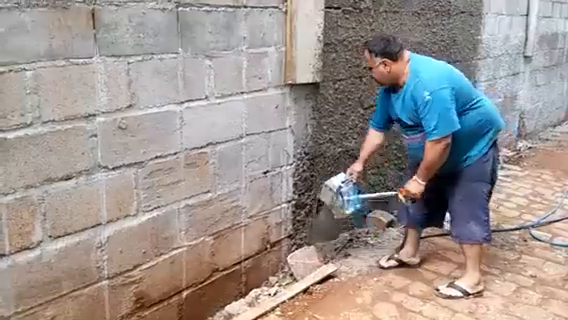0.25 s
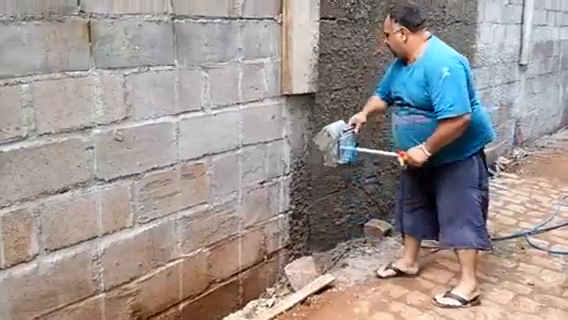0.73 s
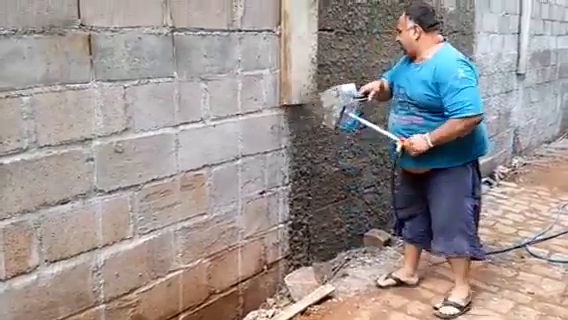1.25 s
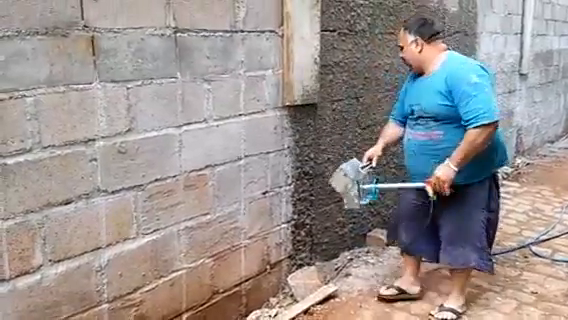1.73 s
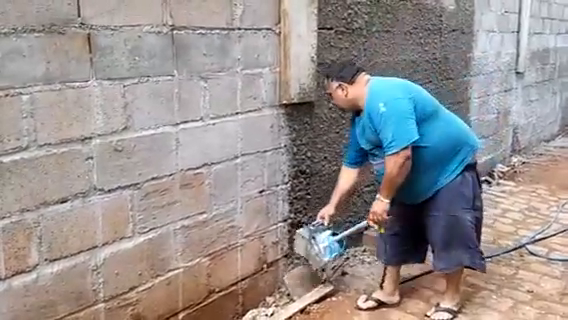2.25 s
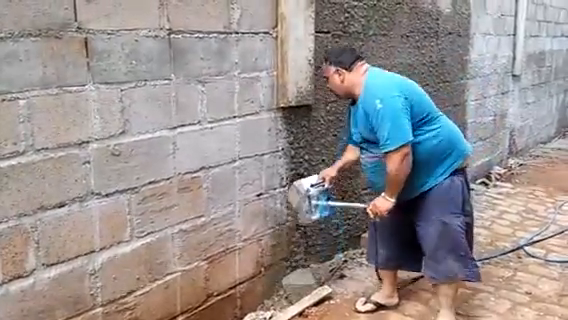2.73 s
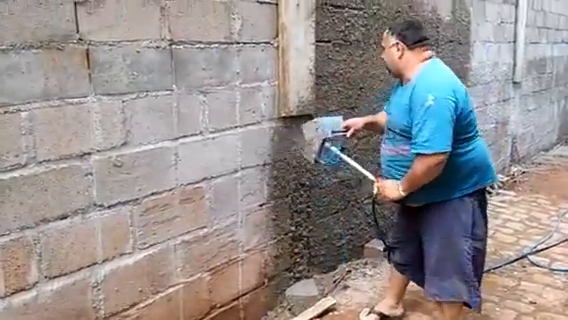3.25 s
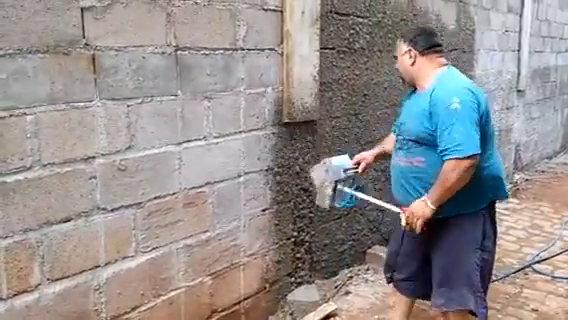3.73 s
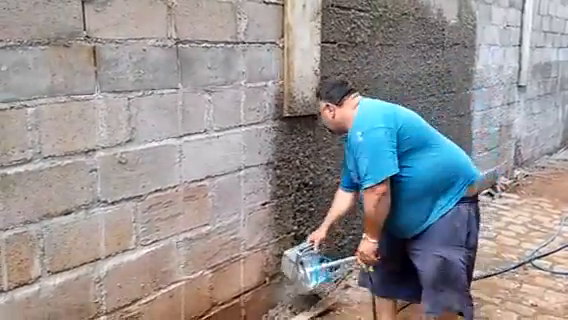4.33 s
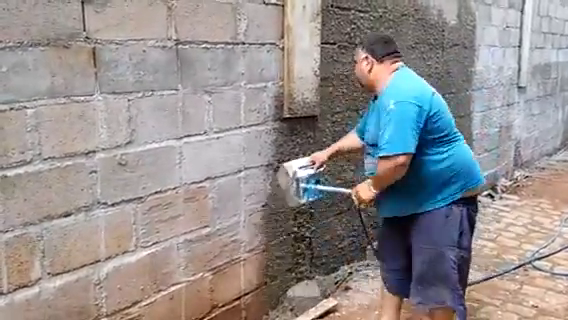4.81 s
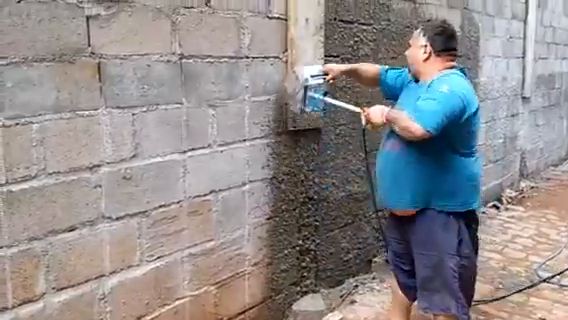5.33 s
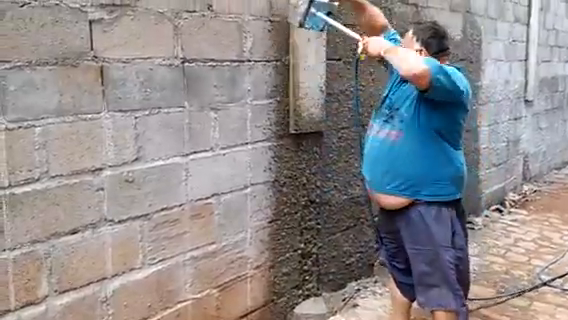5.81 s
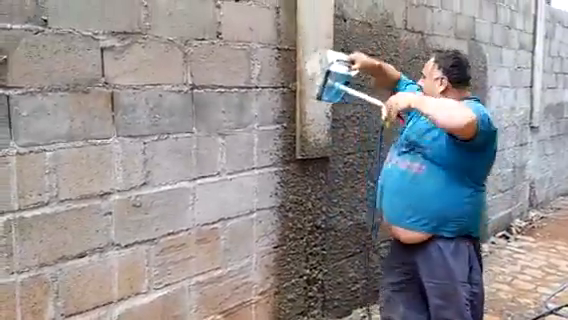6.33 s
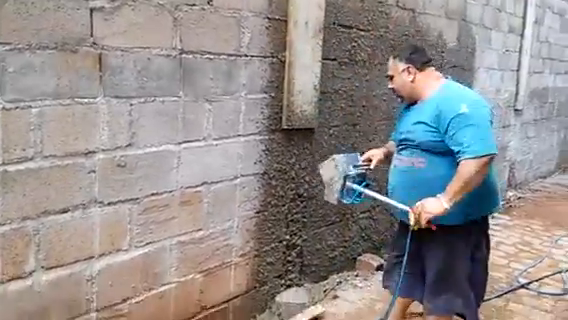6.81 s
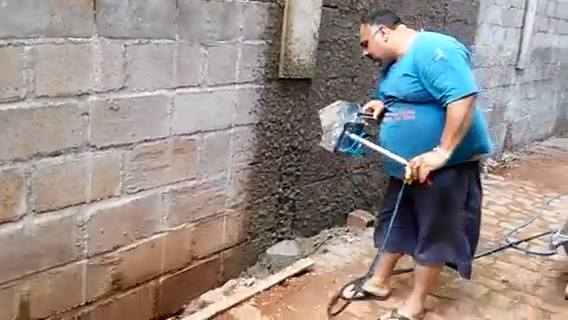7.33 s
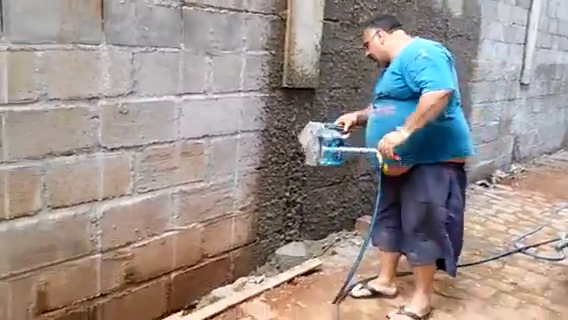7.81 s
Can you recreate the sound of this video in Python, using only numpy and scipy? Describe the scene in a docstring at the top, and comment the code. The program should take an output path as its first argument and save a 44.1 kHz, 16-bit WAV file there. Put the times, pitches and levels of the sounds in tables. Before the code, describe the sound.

Close outdoor capture with slight reflections from wall and ground: loud rushing air throws wet slurry, choking and spitting as lumps pass. Two bursts start slightly soft; the third, longest, opens with a sharp surge. Between them come airy valve singing, dwindling hiss, small wet clicks and low puffs of wind. Finally the spraying stops, and rumbling wind swells into hard, crackling slaps that overload the microphone.

```python
"""Mortar gun in a narrow yard.

A compressed-air gun throws slurry at a block wall in three bursts: filtered noise, sputtered by mortar lumps.
Two bursts open slightly soft, the third with a surge; each dies away as the valve closes and sings, then leaks.
Hollow hopper notes glide, sand grains hit the wall as clustered impulses, splats are short noise swells.
Wind is time-warped noise plus single pressure pulses, at last so strong that a limiter ducks all else."""
import sys
import numpy as np
from scipy import signal
from scipy.fft import rfft, irfft, next_fast_len
from scipy.io import wavfile
from scipy.ndimage import uniform_filter1d, minimum_filter1d, map_coordinates

SR = 44100
rng = np.random.default_rng(int(sys.argv[2]) if len(sys.argv) > 2 else 0)


def generate_wav(sig):
    """Save sig (samples, or channels by samples) to the path in sys.argv[1] as 16-bit PCM at SR."""
    pcm = np.round(np.clip(np.atleast_2d(sig).T, -1, 1) * 32767).astype(np.int16)
    wavfile.write(sys.argv[1], SR, pcm)


N = 355446
TIME = np.arange(N) / SR


def from_db(db):
    """Decibels to amplitude gain."""
    return 10 ** (np.asarray(db) / 20)


def rms_one(x):
    """Scale to an rms of 1."""
    return x / np.sqrt(np.mean(x ** 2) + 1e-20)


def in_time(rows):
    """Interpolate the columns of a curve at every sample."""
    s, *columns = np.transpose(rows)
    return [np.interp(TIME, s, column) for column in columns]


def latest(starts, values):
    """Hold each value from its own start to the next."""
    return values[np.maximum(np.searchsorted(starts, TIME) - 1, 0)]


def since(starts):
    """Seconds since the latest start."""
    return np.maximum(TIME - latest(starts, starts), 0)


def white():
    """Fresh white noise."""
    return rng.standard_normal(N)


def shaped(x, gain_at):
    """Filter by a gain given as a function of frequency; rms 1."""
    size = next_fast_len(len(x))
    hz = np.maximum(np.arange(size // 2 + 1) * SR / size, 1)
    return rms_one(irfft(rfft(x, size) * gain_at(hz), size)[:len(x)])


def coloured(x, points):
    """Filter by a (frequency [Hz], level [dB]) table, interpolated in log frequency; rms 1."""
    at_hz, db = np.transpose(points)
    return shaped(x, lambda hz: from_db(np.interp(np.log(hz), np.log(at_hz), db)))


def resonant(x, centre_hz, width_hz):
    """Two passes through one resonance, about width_hz wide at -3 dB overall; rms 1."""
    return shaped(x, lambda hz: 1 / (1 + ((hz - centre_hz ** 2 / hz) / (1.5 * width_hz)) ** 2))


def wobble(rate_hz, size=N):
    """Random motion up to about rate_hz; rms 1."""
    return shaped(rng.standard_normal(size), lambda hz: 1 / (1 + (hz / rate_hz) ** 4))


def gliding(centre_hz, width_hz):
    """Noise band round a moving centre: two slow wobbles on carriers in quadrature."""
    phase = 2 * np.pi * np.cumsum(centre_hz) / SR
    in_phase = wobble(width_hz / 2, size=len(phase)) * np.cos(phase)
    return in_phase + wobble(width_hz / 2, size=len(phase)) * np.sin(phase)


def mottled(x, depth_db, patch_hz, patch_s):
    """Random patches of louder and softer colour over time and frequency."""
    hz, s, cells = signal.stft(x, SR, nperseg=512)
    field = rng.standard_normal(cells.shape)
    for _ in range(2):
        field = uniform_filter1d(field, max(int(patch_hz / hz[1]), 1), axis=0)
        field = uniform_filter1d(field, max(int(patch_s / s[1]), 1), axis=1)
    patched = signal.istft(cells * from_db(depth_db * rms_one(field)), SR)[1][:N]
    return np.std(x) * rms_one(patched)


def add(out, start, length, sound, rise, fall):
    """Mix in a swell of sound; rise and decay constant are shares of its length."""
    t = TIME[:len(sound)]
    onset = np.sin(np.pi / 2 * np.minimum(t / (rise * length), 1)) ** 2
    decay = np.exp(-np.maximum(t / length - .75, 0) / fall)
    at = int(start * SR)
    out[at:at + len(sound)] += (onset * decay * sound)[:max(N - at, 0)]


def notes(rows, width_hz, rise, fall):
    """Narrow noise bands that swell, glide and fade."""
    out, t = np.zeros(N), TIME[:SR]
    for start, length, db, first_hz, last_hz in rows:
        note = gliding(np.interp(t, [0, length], [first_hz, last_hz]), width_hz)
        add(out, start, length, from_db(db) * note, rise, fall)
    return out


# Trigger pulls: (opens [s], closes [s], jet level [dB], opening level change, + surge or - soft start [dB],
# dying away [dB/s], plume level re jet [dB])
TRIGGER_PULLS = [(0.115, 1.479, -23, -3.5, 88.5, -27), (2.357, 3.651, -24, -1, 80.5, -28),
                 (4.472, 6.252, -24.5, 7, 86, -16.5)]
OPENING_S, SETTLE_S, SAG_DB_PER_S = 0.0044, 0.046, 0.65   # the hose loses pressure while open


def air_flow():
    """Jet strength: a brief swell or dip at opening, a slow sag, a steady dB fade once let go."""
    flow = np.zeros(N)
    for opens, closes, db, opening_db, dying_db_per_s, *_ in TRIGGER_PULLS:
        age, shut = np.maximum(TIME - opens, 0), np.maximum(TIME - closes, 0)
        opening_change_db = opening_db * np.exp(-age / SETTLE_S)
        level_db = db + opening_change_db - SAG_DB_PER_S * age - dying_db_per_s * shut
        flow += from_db(level_db) * np.minimum(age / OPENING_S, 1)
    return flow


# Nozzle hiss colour: (frequency [Hz], level [dB])
NOZZLE_COLOUR = [(300, -43.5), (600, -16.5), (850, -8), (1250, -3.5), (1500, -5), (1900, -6), (2650, -5),
                 (3400, -2.5), (4200, -13.5), (5300, -2), (6500, -0.5), (8100, -1.5), (9000, 2.5),
                 (9700, 0)]
# Hopper note, rising as it empties, sinking as mortar slumps back: (time [s], pitch [Hz], level [dB])
HOPPER_NOTE = [(.12, 573, -19), (.4, 620, -23), (.62, 910, -33), (.95, 1168, -10), (1.25, 1105, -14),
               (1.46, 1044, -10.5), (1.75, 782, -18), (2.36, 597, -19), (2.6, 633, -28), (2.77, 904, -12),
               (3.05, 1020, -17), (3.35, 983, -17), (3.6, 846, -11), (3.9, 758, -24), (4.5, 703, -37),
               (5.05, 898, -20), (5.35, 1104, -20), (6.2, 1076, -13)]
# The mouth's note starts sharp and settles as the first mortar leaves
MOUTH_HZ, MOUTH_SHARP_HZ, MOUTH_SETTLE_S, MOUTH_WIDTH_HZ = 4060, 262.2, .25, 1320
FULL_TILT_M = 1.06   # above this height the mouth turns away


def jet(height_m, age_s, mouth_db=-11, mouth_turn_db_per_m=-10, body_db=-10.0):
    """Nozzle hiss with the resonances of the hopper's mouth and of its hollow body."""
    hollow_hz, hollow_db = in_time(HOPPER_NOTE)
    mouth_hz = MOUTH_HZ + MOUTH_SHARP_HZ * np.exp(-age_s / MOUTH_SETTLE_S)
    mouth_level_db = mouth_db + mouth_turn_db_per_m * np.maximum(height_m - FULL_TILT_M, 0)
    mouth = from_db(mouth_level_db) * gliding(mouth_hz, MOUTH_WIDTH_HZ)
    hollow = from_db(hollow_db) * gliding(hollow_hz, width_hz=220)
    air = mottled(coloured(white(), NOZZLE_COLOUR) + mouth, depth_db=2.5, patch_hz=220, patch_s=0.045)
    return air + from_db(body_db) * hollow


# Sand-on-wall colour: (frequency [Hz], level [dB])
GRIT_COLOUR = [(600, -7), (1100, 3), (2000, 8), (3000, -14.5), (5000, 15.5), (9500, -15.5)]
GRAINS_PER_S = 1900   # median; clumping varies it


def spatter(clump_db=5, size_db=1.0):
    """Wet sand grains hit the wall: random impulses whose density clumps."""
    hits = rng.random(N) < GRAINS_PER_S / SR * from_db(clump_db * wobble(35))
    sizes = from_db(size_db * np.minimum(rng.exponential(1, N), 4)) * rng.choice([-1, 1], N)
    return coloured(hits * sizes, GRIT_COLOUR)


# Mortar lumps in the jet, spitting (+) or choking (-): (time [s], half length [s], level change [dB])
MORTAR_LUMPS = [(0.24, .012, 5), (0.298, 0.011, 5), (0.532, .012, -2), (0.614, 0.017, 5), (0.707, 0.022, 6),
                (0.76, .014, 3.5), (.82, .014, 1), (1.09, 0.01, -2), (1.348, .016, -1.5),
                (1.423, 0.03, 3.5), (2.625, .014, 1.5), (2.687, 0.021, 4.5), (2.758, 0.023, 3.5),
                (2.834, 0.026, -4.5), (2.903, .02, -2.5), (2.996, 0.013, 5), (3.024, .012, 3),
                (3.1, 0.011, 2.5), (3.29, .028, 4), (3.512, .016, 3.5), (3.56, 0.015, 3.5),
                (4.573, 0.014, -7), (4.615, 0.011, 0.5), (4.665, 0.017, 4), (4.868, 0.013, 4),
                (4.94, 0.014, -2.5), (5.029, 0.015, 6.5), (5.14, 0.0098, 2.5), (5.177, 0.014, -1),
                (5.266, .014, 0), (5.33, 0.017, 4), (5.377, .012, 7), (5.477, 0.0075, 2), (5.572, 0.015, 6),
                (5.639, 0.013, 0)]


def sputter(spray, wet_hz=3600, treble_share=0.12, lump_db=1.35, gargle_db=0.98):
    """Lumps choke the jet and are blown clear; below wet_hz the level swings more than above."""
    spit_db = gargle_db * wobble(41)
    for s, half_length, db in MORTAR_LUMPS:
        spit_db = spit_db + db * np.exp(-np.minimum(((TIME - s) / half_length) ** 2, 20))
    wet = signal.sosfiltfilt(signal.butter(2, wet_hz, fs=SR, output="sos"), spray)
    lumps = from_db(lump_db * resonant(white(), 40, 45))
    return lumps * (wet * from_db(spit_db) + (spray - wet) * from_db(treble_share * spit_db))


# Plume roar colour: (frequency [Hz], level [dB])
PLUME_COLOUR = [(30, -17), (90, -13), (180, -2.5), (260, 1.5), (350, 2.5), (450, -5), (600, -4), (900, -18),
                (1500, -16)]
PLUME_DB_PER_M = 10


def plume(height_m, opens_s, plume_db):
    """Low roar of the spray plume, louder as the gun is lifted."""
    level_db = latest(opens_s, plume_db) + PLUME_DB_PER_M * height_m
    return from_db(level_db) * coloured(white(), PLUME_COLOUR)


# Hollow tones in the spray: (start [s], length [s], level [dB], first pitch [Hz], last pitch [Hz])
HOLLOW_TONES = [(.13, 0.36, -40.5, 615, 640), (.4, 0.18, -38.5, 870, 845), (.85, 0.44, -33.5, 1370, 1315),
                (.92, 0.61, -44.5, 355, 344), (1.07, .22, -39, 1820, 1860), (2.36, 0.47, -43, 915, 895),
                (2.38, .25, -30, 2130, 2200), (2.46, 0.33, -42, 620, 596), (2.45, .25, -38.5, 133.6, 169.3),
                (2.8, 0.83, -40, 175, 196.7), (3.22, 0.23, -46, 2030, 1998), (3.25, .38, -35, 851, 805),
                (3.36, 0.25, -34, 1296, 1240), (4.52, .34, -39, 230.5, 192), (4.9, 0.71, -39, 366.3, 340),
                (5.15, 0.36, -36, 1767, 1805), (5.2, 0.46, -38, 1340, 1260),
                (5.42, 0.43, -42.5, 2000, 2000), (5.7, 0.61, -39.5, 1060, 1082),
                (5.8, 0.51, -32.5, 409.5, 429)]


def hoots():
    """Hopper tones that come and go: narrow gliding noise bands."""
    return notes(HOLLOW_TONES, width_hz=44, rise=.2, fall=0.21)


# Leaks until the valve seats: (start [s], length [s], level [dB])
VALVE_LEAKS = [(1.5, 0.72, -25.5), (3.648, 0.68, -28), (6.237, 0.26, -26.5), (6.887, 0.22, -32)]
LEAK_RISE_S, LEAK_SAG_DB_PER_S, SEATING_DB_PER_S, SEEP_DB = 0.037, 9, 73.5, -46.5


def leak_flow():
    """Leak strength: it sags, then drops to a faint seep as the valve seats."""
    flow = np.full(N, from_db(SEEP_DB))
    for start, length, db in VALVE_LEAKS:
        age = np.maximum(TIME - start, 0)
        level_db = db - LEAK_SAG_DB_PER_S * age - SEATING_DB_PER_S * np.maximum(age - length, 0)
        flow = np.hypot(flow, from_db(level_db) * np.minimum(age / LEAK_RISE_S, 1))
    return flow


# Closing-valve whistles: (start [s], length [s], level [dB], first pitch [Hz], last pitch [Hz])
VALVE_WHISTLES = [(1.563, 0.18, -42, 5020, 5130), (1.74, 0.13, -46.5, 5310, 5430),
                  (3.688, 0.15, -38, 4980, 4980), (3.9, 0.13, -40, 5430, 5420),
                  (6.327, 0.11, -36, 4970, 5130), (6.49, 0.13, -56, 5030, 5480)]


def whistles(width_hz=420):
    """Thin airy notes of the closing valve: gliding noise bands."""
    return notes(VALVE_WHISTLES, width_hz, rise=0.096, fall=0.71)


# Half-closed valve resonances: (frequency [Hz], width [Hz], level [dB])
VALVE_RESONANCES = [(2880, 680, -44), (5160, 770, -37.5)]
# Leak hiss colour: (frequency [Hz], level [dB])
LEAK_COLOUR = [(1000, -33.5), (2800, -12.5), (4200, -24), (5500, -14), (7000, -6.5), (8200, -3.5),
               (9700, -1.5)]


def valve(flow, singing_db=-40, range_db=9, flicker_db=1.6):
    """The seat always leaks, and rings while the flow is near singing_db."""
    flow_db = 20 * np.log10(flow + 1e-9)
    half_shut = np.exp(-.5 * ((flow_db - singing_db) / range_db) ** 2)
    song = sum(from_db(db) * resonant(white(), hz, width) for hz, width, db in VALVE_RESONANCES)
    leak = leak_flow() * from_db(flicker_db * wobble(70)) * coloured(white(), LEAK_COLOUR)
    return half_shut * song + leak + whistles()


# Wet spits, gurgles, drips, ticks, shuffles, and the pop as the valve opens for the third burst: (start [s],
# length [s], level [dB], centre [Hz], width [Hz])
WET_SPLATS = [(0.018, 0.013, -45.5, 2454, 1500), (0.118, 0.0087, -18.5, 3020, 500),
              (1.523, 0.032, -22, 3700, 3000), (1.742, 0.031, -37.5, 3580, 3000),
              (1.929, 0.035, -42, 1230, 1200), (2.075, 0.019, -42, 3530, 5000),
              (2.162, 0.0041, -35, 8050, 4000), (2.189, 0.0045, -28, 8000, 4500),
              (2.28, 0.048, -47, 850, 110), (2.44, 0.22, -39, 278, 110), (3.664, .025, -41, 3820, 2500),
              (4.038, 0.029, -45.5, 1700, 900), (4.196, 0.012, -34, 7840, 5000),
              (4.285, 0.024, -31, 8100, 2600), (4.287, 0.021, -36, 2750, 180),
              (4.412, 0.023, -34, 9200, 2500), (4.48, 0.0038, -7.5, 4000, 1607),
              (6.875, 0.075, -44, 2250, 1407), (6.95, 0.098, -42.5, 1910, 1100),
              (7.03, .014, -33, 2320, 200), (7.088, 0.0032, -26, 8750, 3000),
              (7.104, 0.0052, -26.5, 8450, 3000)]


def splats(grain_db=4):
    """Grainy splashes and scuffs round the gun and the feet, and one pop of the opening valve: swells of
    resonant noise."""
    out = np.zeros(N)
    for start, length, db, centre_hz, width_hz in WET_SPLATS:
        noise, sizes = rng.standard_normal((2, SR // 4))
        splash = resonant(noise * from_db(grain_db * sizes), centre_hz, width_hz)
        add(out, start, length, from_db(db) * splash, rise=.16, fall=.5)
    return out


def eddies(eddy_hz, size, deepest_hz=55, lowest=0.47, flutter_db=1.67, flutter_hz=90, evenness=0.8):
    """Turbulent pressure, falling exponentially with frequency, swept past in spurts by time warping."""
    corner_hz = deepest_hz + lowest * eddy_hz
    noise = shaped(rng.standard_normal(size),
                   lambda hz: np.exp(-hz / eddy_hz) / (1 + (corner_hz / hz) ** 3))
    power = uniform_filter1d(noise ** 2, int(2 * SR / eddy_hz))
    noise = noise / (np.abs(power) + 1e-6) ** (evenness / 2)
    flutter = shaped(rng.standard_normal(size), lambda hz: hz * np.exp(-(hz / flutter_hz) ** 2))
    speed = from_db(flutter_db * flutter)
    position = np.cumsum(speed / (speed.mean() + speed.std()))
    passed = map_coordinates(noise, [position], mode="mirror")
    return rms_one(passed * np.sqrt(speed))


BUFFETS_PER_S, BUFFET_S, BUFFET_DB, BUFFET_SPREAD_DB = 22, 0.026, 4, 1
CALM_EDDY_HZ, GALE_EDDY_HZ = 52.4, 172   # in still air; added at a wind of 0 dB


def buffets(wind_db):
    """Random buffets, stronger and quicker with wind: (start [s], length [s], level [dB], eddy rate [Hz])."""
    chance = rng.random((int(BUFFETS_PER_S * TIME[-1]), 3))
    starts = (np.arange(len(chance)) + chance[:, 0]) / BUFFETS_PER_S
    db = np.interp(starts, TIME, wind_db) + BUFFET_SPREAD_DB * (2 * chance[:, 1] - 1)
    eddy_hz = CALM_EDDY_HZ + GALE_EDDY_HZ * from_db(db) ** 0.53
    return list(zip(starts, BUFFET_S * (.5 + chance[:, 2]), db + BUFFET_DB, eddy_hz))


# Hard slaps of air on the microphone: (time [s], level [dB], eddy rate [Hz])
AIR_SLAPS = [(6.727, 0.5, 232), (6.757, -2, 190), (6.78, 0, 312), (6.799, -2, 240), (7.137, -2.5, 230),
             (7.388, -11, 230), (7.424, -7.5, 317), (7.483, -8, 210), (7.551, 4, 270), (7.562, 12, 520),
             (7.575, 10.5, 520), (7.585, 11.5, 560), (7.607, 11, 480), (7.618, 7, 474), (7.627, 8, 446),
             (7.659, 12.5, 520), (7.678, 7.5, 520), (7.687, 10, 480), (7.726, 5, 500), (7.742, 4, 460),
             (7.764, 9, 520), (7.777, 13.5, 1050), (7.784, 5, 900), (7.818, 9, 1160), (7.832, 9.5, 850),
             (7.877, 4.5, 603), (7.888, 2, 480), (7.946, 18, 1200), (7.954, 7, 800), (7.989, 5, 604),
             (8.001, 3.5, 500), (8.05, 9, 750)]


def slaps(crack_db=-14, crack_s=0.0018, crack_low_hz=1000, crack_high_hz=2600, full_crack_hz=550):
    """One push and pull of pressure each, shorter for faster eddies; fast ones crack dully in the port."""
    out, edge = np.zeros(N), np.zeros(N)
    for s, db, eddy_hz in AIR_SLAPS:
        u = 2 * np.pi * eddy_hz * (TIME - s)
        out += from_db(db) * 2 * u / (1 + u ** 2) * np.exp(-np.minimum(np.abs(u), 60) / 8)
        sharpness = min(eddy_hz / full_crack_hz, 1) ** 4
        edge += from_db(db) * sharpness * np.exp(-np.minimum(((TIME - s) / crack_s) ** 2, 30))
    crack = shaped(white(), lambda hz: 1 / (1 + (crack_low_hz / hz) ** 2)
                   / (1 + (hz / crack_high_hz) ** 12) / hz)
    return out + from_db(crack_db) * edge * crack


# Soft round thumps of air on the microphone: (time [s], level [dB], eddy rate [Hz])
AIR_THUMPS = [(1.996, -21, 85), (2.229, -12.5, 145), (2.341, -9, 68), (3.118, -21, 119.6),
              (3.748, -6.5, 137), (3.817, -19, 110), (4.177, -12, 120.6), (4.212, -10.5, 75),
              (4.418, -7, 172), (4.534, -14, 130), (6.638, -5, 100), (6.855, -2, 101), (7.06, -3, 90),
              (7.208, -1, 65), (7.245, -1.5, 85), (7.35, -1, 75), (7.493, -6, 125)]


def thumps(cycles=0.47):
    """Soft puffs: a sine under a Gaussian, so the pressure swings briefly and is gone."""
    out = np.zeros(N)
    for s, db, eddy_hz in AIR_THUMPS:
        turns = np.clip(eddy_hz * (TIME - s), -10, 10)
        out += from_db(db) * np.sin(2 * np.pi * turns) * np.exp(-(turns / cycles) ** 2)
    return out


def crackle(pressure, tearing_db=7, crackle_db=-17, sharpness=3, low_hz=1200, high_hz=2500):
    """The strongest eddies tear at the port rim: a soft threshold makes edges, band-passed."""
    edges = pressure * (np.tanh(sharpness * (pressure - from_db(tearing_db))) + 1)
    band = signal.butter(3, [low_hz, high_hz], "band", fs=SR, output="sos")
    return from_db(crackle_db) * signal.sosfilt(band, edges)


# Wind strength at the microphone: (time [s], level [dB])
WIND_STRENGTH = [(0, -49), (.62, -34), (.85, -54), (2.3, -42.5), (2.6, -49.5), (3.5, -57.5), (4.0, -42.5),
                 (4.9, -51.5), (5.5, -36.5), (6.25, -32.5), (6.58, -14.5), (6.69, -25), (6.8, -13),
                 (6.97, -20.5), (7.1, -16), (7.31, -18), (7.53, -13.5), (7.6, -4), (7.8, -3.5),
                 (7.85, -4.5), (8.06, 0)]
# Big gusts: (start [s], length [s], level [dB], eddy rate [Hz])
BIG_GUSTS = [(.58, 0.099, -32.5, 70), (2.083, .02, -34, 55.3), (2.2, .04, -25, 65),
             (3.73, 0.076, -25.5, 70), (4.099, 0.054, -18.5, 48), (4.157, 0.04, -14.5, 58),
             (4.24, 0.063, -20, 59.5), (4.401, 0.055, -23, 75), (4.515, 0.03, -19.5, 75),
             (5.493, 0.066, -24, 90.4), (5.729, 0.076, -20, 95), (5.896, 0.032, -19, 115),
             (6.077, 0.063, -12.5, 170), (6.305, 0.025, -17, 135), (6.448, 0.034, -16, 90.4),
             (6.515, 0.049, -8, 125), (6.591, 0.057, -9.5, 92.6), (6.721, 0.029, -6, 170),
             (6.763, 0.04, -6, 239), (6.822, 0.025, -8.5, 115), (6.915, .03, -18.5, 91.6),
             (7.019, 0.06, -10, 91), (7.114, 0.055, -10.5, 210), (7.192, 0.09, -12.5, 58),
             (7.31, 0.038, -15.5, 75), (7.383, 0.027, -11, 168), (7.409, 0.023, -6.5, 288),
             (7.471, 0.043, -8, 176), (7.547, 0.045, 5.5, 290), (7.594, 0.035, 8, 250),
             (7.633, 0.065, 7.5, 260), (7.706, 0.05, 1.5, 270), (7.76, 0.025, 0.5, 420),
             (7.797, 0.031, 6.5, 302), (7.86, 0.041, 1, 381), (7.934, 0.033, 4, 480),
             (7.969, 0.055, 1.5, 299), (8.029, 0.037, -0.5, 500)]
# Microphone port colour: (frequency [Hz], level [dB])
PORT_COLOUR = [(50, -0.5), (130, -1), (270, 1.5), (380, 0.5), (540, -0.5), (750, 1.5), (1300, 4)]
GALE_DB = -6.5   # wind this strong tears fully at the port


def wind(breeze_hz=90, port_hz=3300, breeze_db=-2):
    """Rumbling breeze, gusts, thumps and slaps; the microphone port colours and dulls them."""
    wind_db, = in_time(WIND_STRENGTH)
    out = from_db(wind_db + breeze_db) * eddies(breeze_hz, size=N, deepest_hz=7.2, flutter_db=0.47)
    for start, length, db, eddy_hz in BIG_GUSTS + buffets(wind_db):
        add(out, start, length, from_db(db) * eddies(eddy_hz, size=SR // 5), rise=0.34, fall=0.45)
    out = np.std(out) * coloured(out, PORT_COLOUR) + slaps() + thumps()
    gale = np.minimum(from_db(wind_db - GALE_DB), 1) ** 2
    low_pass = signal.butter(3, port_hz, fs=SR, output="sos")
    return signal.sosfilt(low_pass, out + gale * crackle(out))


def yard_echo(x, height_m, ground_s_per_m=.0027, ground=0.15, wall_s=.0038, wall=0.14,
              scatter_db=-12, t60_s=0.047):
    """Ground echo, later as the gun rises; wall echo; a short decaying noise tail for scatter."""
    def echo(delay_s):
        return np.interp(TIME - delay_s, TIME, x)
    t = TIME[:SR // 4]
    tail = rng.standard_normal(len(t)) * from_db(-60 * t / t60_s) * (t > wall_s)
    scattered = signal.fftconvolve(x, tail / np.linalg.norm(tail))[:N]
    echoes = ground * echo(ground_s_per_m * height_m) + wall * echo(wall_s + .0001 * height_m)
    return x + echoes + from_db(scatter_db) * scattered


# Yard background colour: (frequency [Hz], level [dB])
YARD_COLOUR = [(20, -27), (60, -9.5), (130, 4.5), (250, -18.5), (420, -15), (700, -13), (830, -6),
               (980, -13.5), (1600, -18.5), (2600, -23), (4500, -27.5), (9000, -18.5)]


def yard_background(level_db=-41):
    """Steady coloured noise of the yard."""
    return from_db(level_db) * coloured(white(), YARD_COLOUR)


# Gun sweep up and down the wall: (time [s], height [m])
GUN_SWEEP = [(.35, 0.53), (.55, 0.65), (.9, 0.65), (1.3, 1.16), (1.6, 0.94), (2.35, 0.37), (2.6, 0.45),
             (2.9, 0.67), (3.3, 1.33), (3.6, 0.85), (4.3, 0.265), (4.75, 0.51), (5.4, 1.09), (5.75, 1.77),
             (6.35, 1.6)]


def scene(jet_db=10.0, spatter_db=-3):
    """Gun, yard and wind at one microphone."""
    height_m, = in_time(GUN_SWEEP)
    opens_s, *_, plume_db = np.transpose(TRIGGER_PULLS)
    flow = air_flow()
    hiss = from_db(jet_db) * jet(height_m, since(opens_s))
    sputtering = sputter(hiss + from_db(spatter_db) * spatter())
    spray = flow * (sputtering + plume(height_m, opens_s, plume_db))
    gun = spray + hoots() + valve(flow) + splats()
    return (yard_echo(gun, height_m) + yard_background() + wind())[None]


def limiter(x, ceiling_db=-0.9, release_db_per_s=90, attack_s=.0015):
    """Gain drops just ahead of every peak over the ceiling and recovers at a steady dB rate."""
    over_db = np.maximum(20 * np.log10(np.abs(x) + 1e-9) - ceiling_db, 0)
    release_db = release_db_per_s * TIME
    held_db = np.maximum.accumulate(over_db + release_db) - release_db
    span = int(attack_s * SR) + 1
    return x * from_db(uniform_filter1d(minimum_filter1d(-held_db, span), span))


def record(dry, bass_cut_hz=40, cutoff_hz=9950):
    """The microphone sheds the deepest bass; a limiter, then a steep cut of the top."""
    high_pass = signal.butter(1, bass_cut_hz, "high", fs=SR, output="sos")
    heard = signal.sosfilt(high_pass, dry[0])
    low_pass = signal.ellip(12, .1, 75, cutoff_hz, fs=SR, output="sos")
    return signal.sosfilt(low_pass, limiter(heard))[None]


dry = scene()
out = record(dry)
generate_wav(out)
```